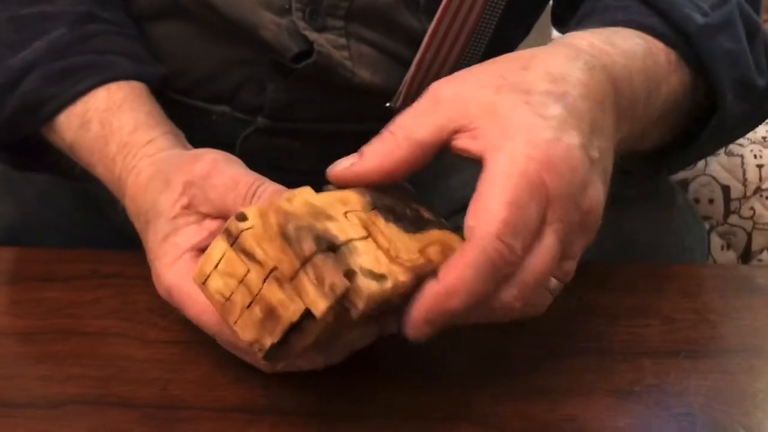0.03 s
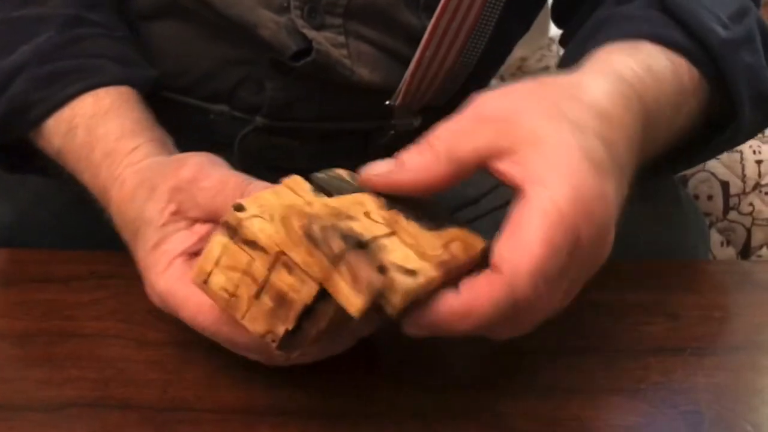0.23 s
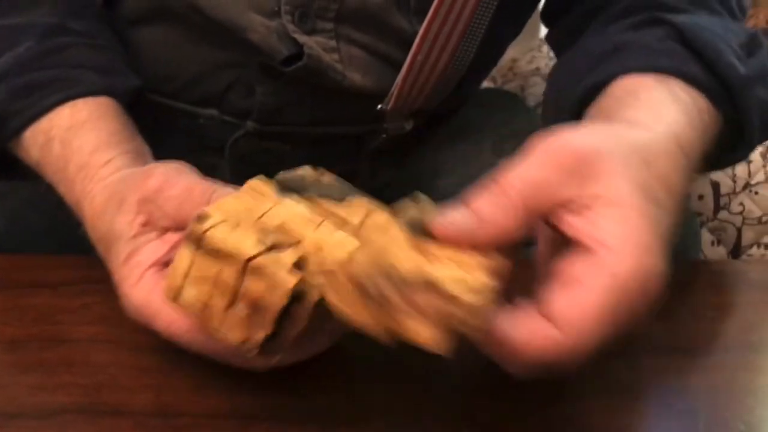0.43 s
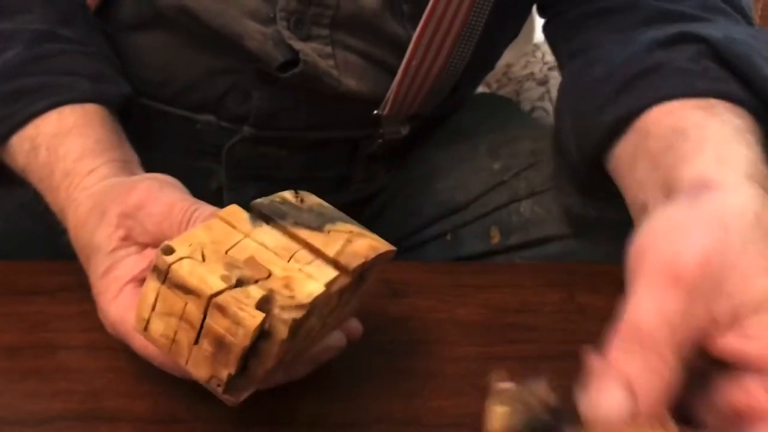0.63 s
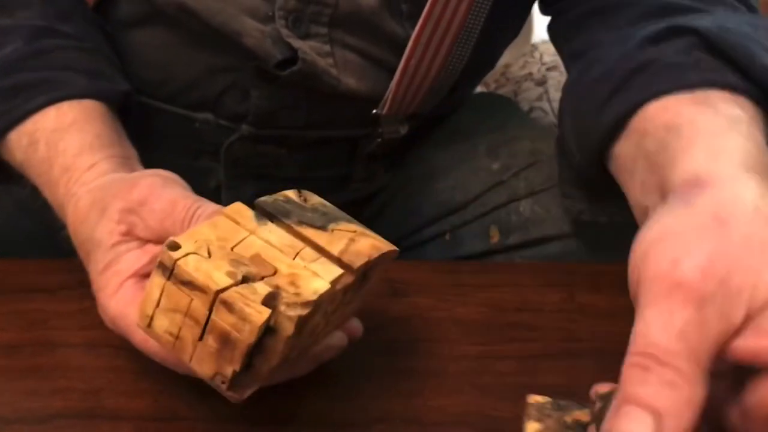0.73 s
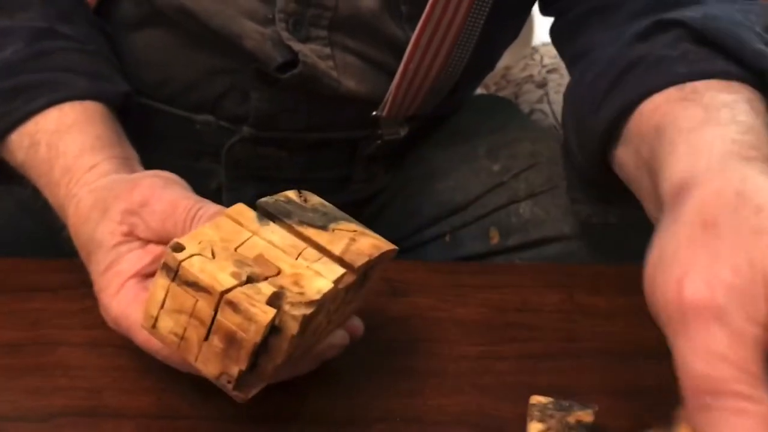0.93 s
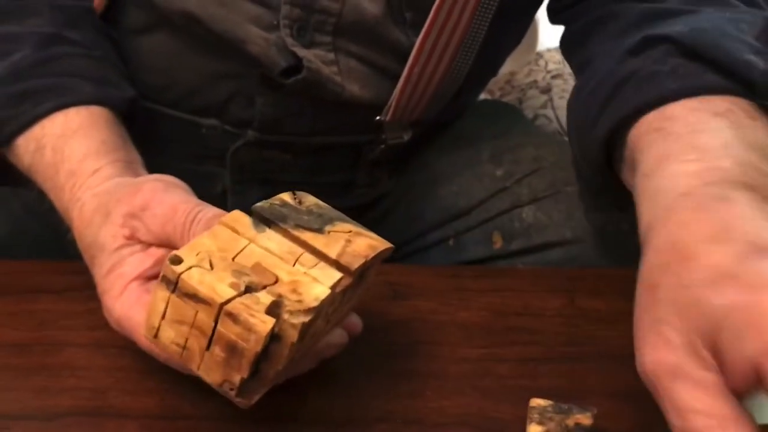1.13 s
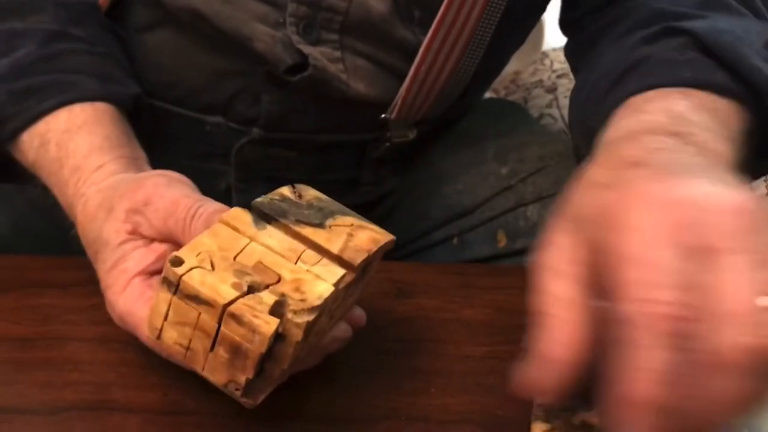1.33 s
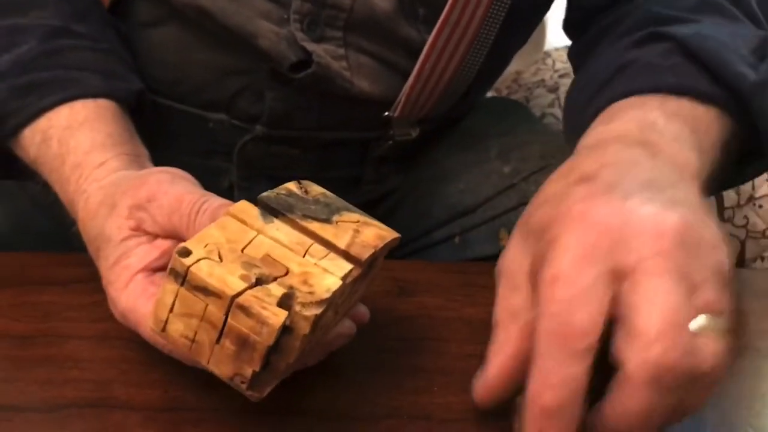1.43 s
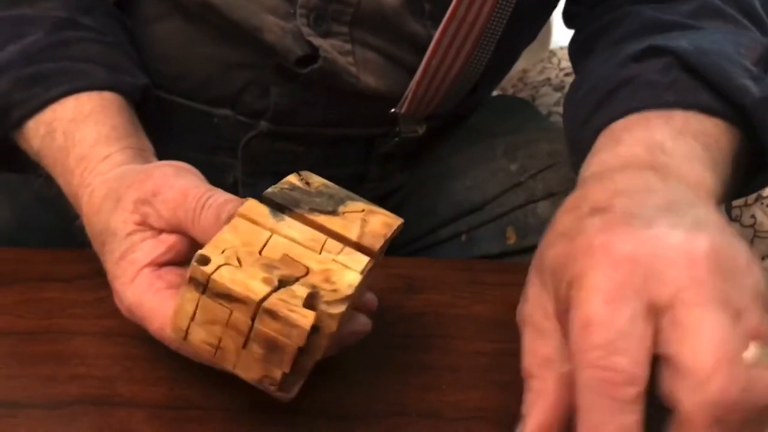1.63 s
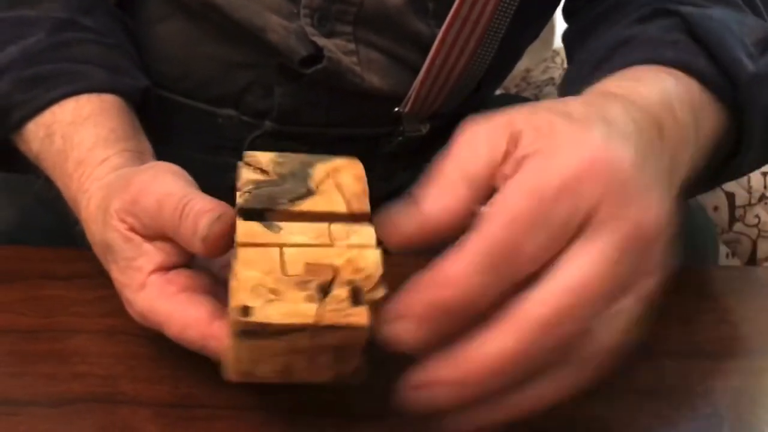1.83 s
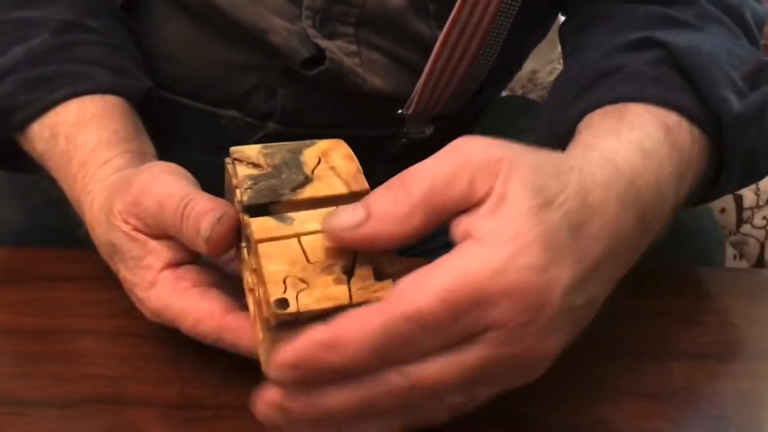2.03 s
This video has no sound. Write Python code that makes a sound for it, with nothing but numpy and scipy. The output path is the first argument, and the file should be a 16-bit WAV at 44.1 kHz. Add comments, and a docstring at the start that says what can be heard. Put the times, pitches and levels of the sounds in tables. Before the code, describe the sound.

Small wood block pieces clack apart by hand, one dropped rattling on a tabletop and tipped

```python
"""A loose piece of a wooden puzzle is dropped on a wooden table, rattles to rest, and is knocked over and nudged.
Each knock adds a short click, the piece's own dying tones, a table thud and a low boom that lingers.
Before that it slides out of the block with dull clicks, heard with a short ring of the block held in the hands.
Shaped noise makes the soft rubbing of skin and wood, the low bumps of moving arms and the quiet room.
Near reflections and a fading noise tail make the table and the small room answer."""
import sys
import numpy as np
from scipy import signal
from scipy.fft import rfft, irfft, next_fast_len
from scipy.io import wavfile

SR = 44100
rng = np.random.default_rng(int(sys.argv[2]) if len(sys.argv) > 2 else 0)


def dump(signal):
    """Clip the signal to [-1, 1] and save it as 16-bit WAV at the path in sys.argv[1]."""
    limited = np.clip(np.atleast_2d(signal).T, -1, 1)
    pcm = np.round(limited * 32767).astype(np.int16)
    wavfile.write(sys.argv[1], SR, pcm)


N = 92610  # samples in the scene
LENGTH, RING_LENGTH = 32768, 6000  # samples in one blow, and in the ring of the loose piece
T = np.arange(LENGTH) / SR  # seconds within one blow
HZ = np.fft.rfftfreq(LENGTH, 1 / SR)


def amp(db):
    """Turn decibels into a gain."""
    return 10 ** (np.asarray(db) / 20)


def along(points, hz):
    """Read a curve of (pitch_hz, value) points on a logarithmic pitch axis."""
    point_hz, value = np.transpose(points)
    return np.interp(np.log(hz + 1), np.log(point_hz), value)


def unit(x):
    """Scale a sound to unit energy."""
    return x / np.linalg.norm(x)


def add(track, start_s, sound):
    """Mix a sound into the track, cutting it off at the end of the track."""
    part = track[round(start_s * SR):][:len(sound)]
    part += sound[:len(part)]


def pulse(colour):
    """A click of unit energy with the given spectrum, packed as early as possible (minimum phase)."""
    cepstrum = irfft(np.log(amp(along(colour, HZ))))
    # fold the second half onto the first, so that nothing sounds before the click
    cepstrum[1:LENGTH // 2] *= 2
    cepstrum[LENGTH // 2 + 1:] = 0
    return unit(irfft(np.exp(rfft(cepstrum))))


def noise(colour):
    """Steady noise with the given spectrum and an rms of 1."""
    size = next_fast_len(N + LENGTH)
    gain = amp(along(colour, np.fft.rfftfreq(size, 1 / SR)))
    x = irfft(rfft(rng.standard_normal(size)) * gain, size)[:N]
    return x / x.std()


def soften(x, cutoff_hz):
    """A softer contact loses its treble."""
    return signal.lfilter(*signal.butter(2, cutoff_hz, fs=SR), x)


def modes(hz, t60, size=LENGTH):
    """One dying sine per row; each falls by 60 dB in its t60 seconds."""
    t = T[:size]
    decay = np.exp(-np.log(1000) * t / t60[:, None])
    return np.sin(2 * np.pi * np.outer(hz, t)) * decay


def ringing(rows):
    """A ring of unit energy, made of dying sines from (pitch_hz, t60_s, level_db) rows."""
    hz, t60, level_db = np.transpose(rows)
    return unit(amp(level_db) @ modes(hz, t60))


def crack(click):
    """Rough faces meet at many points within a few milliseconds, which roughens the click."""
    crunch_s, crunch_share = 0.0014, 0.65  # fade time to 1/e; crunch energy before the first contact is added
    force = np.sqrt(crunch_share) * unit(rng.standard_normal(LENGTH) * np.exp(-T / crunch_s))
    force[0] += np.sqrt(1 - crunch_share)
    return unit(irfft(rfft(click) * rfft(force)))


def toned(x, tone_hz):
    """The spot struck strengthens one band of the click."""
    band = signal.iirpeak(tone_hz, 7.2, fs=SR)  # 7.2: sharpness (Q)
    return x + amp(1.5) * signal.lfilter(*band, x)  # 1.5 dB: gain of the added band


# near reflections from tabletop and body, before their treble is dulled: delay_s, gain (plain factor)
NEAR_REFLECTIONS = [(.0023, 0.53), (.0031, 0.32), (.0052, .35), (.0066, .2)]


def reflected(x):
    """A click followed by a few delayed copies, dulled above 4500 Hz."""
    copies = sum(gain * np.exp(-2j * np.pi * HZ * delay_s) for delay_s, gain in NEAR_REFLECTIONS)
    near = copies / (1 + 1j * HZ / 4500)
    return irfft(rfft(x) * (1 + near))


# how long the room takes to fade by 60 dB: pitch_hz, t60_s
ROOM_FADE = [(60, 0.37), (200, 0.26), (600, 0.3), (1500, 0.29), (3000, 0.2), (6000, 0.28), (14000, 0.12)]
# tone balance of the room's answer: pitch_hz, level_db
ROOM_BALANCE = [(50, 9), (200, -1.5), (800, 1.5), (2500, -4.5), (5000, -12), (9000, -9.5), (16000, -11)]


def room(x):
    """The room's blurred answer to one blow: noise that builds up quickly and fades at its own rate per pitch."""
    rise_s = 0.0009
    hz, t, grid = signal.stft(rng.standard_normal(LENGTH), SR, nperseg=256)
    fade = amp(-60 * t / along(ROOM_FADE, hz)[:, None])
    tail = signal.istft(grid * fade, SR)[1][:LENGTH]
    tail = unit(tail * (1 - np.exp(-(T / rise_s) ** 2)))
    return irfft(rfft(x) * rfft(tail) * amp(along(ROOM_BALANCE, HZ)))


def strokes(rows):
    """Loudness of movements: each rises in a line for rise_s, then falls about 27 dB per fall_s."""
    t = np.arange(N) / SR
    total = np.zeros(N)
    for start_s, rise_s, fall_s, level_db in rows:
        swell = np.clip((t - start_s) / rise_s, 0, 1)
        fade = np.exp(-np.pi * np.maximum(t - start_s - rise_s, 0) / fall_s)
        total += amp(level_db) * swell * fade
    return total


def friction(rows, colour, grain_db, grain_rate):
    """A sliding hiss whose loudness wavers finely: grain_rate random levels per second, spread by grain_db."""
    grain = np.interp(np.arange(N) / SR * grain_rate, np.arange(N), rng.standard_normal(N))
    return strokes(rows) * amp(grain_db * grain) * noise(colour)


# tone balance of the quiet room: pitch_hz, level_db
QUIET_BALANCE = [(12, -31.5), (20, -9), (44, 6), (107, -11), (177, -1), (241, -10.5), (367, -13),
                 (949, -24), (1480, -19), (3530, -21), (4940, -27), (9140, -25.5), (16000, -36)]


def quiet_room():
    """Faint steady noise under everything."""
    return amp(-65.5) * noise(QUIET_BALANCE)


# low bumps of the moving arms: start_s, rise_s, fall_s, level_db
ARM_BUMPS = [(.29, 0.032, 0.27, -45.5), (.645, 0.04, 0.25, -49), (1.38, 0.027, 0.11, -53)]
# their tone balance: pitch_hz, level_db
ARM_BALANCE = [(15, -15.5), (40, 1), (60, -5), (100, -20.5), (300, -19.5), (2000, -90)]


def arm_bumps():
    """Moving arms make low noise that swells and dies away."""
    return strokes(ARM_BUMPS) * noise(ARM_BALANCE)


# skin brushing the wood: start_s, rise_s, fall_s, level_db
SKIN_RUBS = [(.065, 0.07, 0.61, -55.5), (.195, 0.01, 0.073, -53), (.27, 0.021, 0.37, -72),
             (.65, 0.069, 0.045, -69.5), (.83, 0.19, 0.19, -68.5), (1.77, 0.061, 0.36, -66.5)]
# its tone balance: pitch_hz, level_db
SKIN_BALANCE = [(100, 4), (400, 3), (1000, -2.5), (2600, -3.5), (3600, -3.5), (4600, 1), (6300, -6),
                (7500, -12), (8700, -6.5), (9600, -1), (10500, -6), (13000, -10), (16000, -25.5)]


def skin_rubs():
    """Skin brushes the wood with a soft, grainy hiss."""
    return friction(SKIN_RUBS, SKIN_BALANCE, grain_db=2.5, grain_rate=400)


# the piece scraping in its slot: start_s, rise_s, fall_s, level_db
SLOT_SCRAPES = [(.125, 0.018, 0.0616, -65.5), (.18, 0.009, 0.032, -54), (.28, 0.046, 0.037, -55.5),
                (.36, 0.028, 0.046, -56)]
# its tone balance: pitch_hz, level_db
SLOT_BALANCE = [(200, -13), (1200, -7), (3000, 3), (3600, -14), (4600, 5), (5100, -7), (5550, 9),
                (5900, -1), (6400, 0), (7400, -19), (9600, -10), (10400, -15), (11700, -1), (16000, -42)]


def slot_scrapes():
    """Wood scrapes on wood as the piece leaves its slot, a hiss with strong narrow bands."""
    return friction(SLOT_SCRAPES, SLOT_BALANCE, grain_db=3, grain_rate=600)


# a piece sliding over the table: start_s, rise_s, fall_s, level_db
TABLE_SLIDES = [(1.345, 0.028, 0.21, -56.5), (1.39, 0.049, 0.34, -64.5)]
# its tone balance: pitch_hz, level_db
SLIDE_BALANCE = [(100, 1), (1000, 1.5), (2200, -5), (2860, 0.5), (3300, -2.5), (5000, -7), (5450, -1),
                 (6200, -26), (8000, -21), (9100, -2), (9600, -1), (10600, -14.5), (13000, -11),
                 (16000, -38)]


def table_slides():
    """The piece slides over the tabletop with a grainy hiss."""
    return friction(TABLE_SLIDES, SLIDE_BALANCE, grain_db=2, grain_rate=500)


# clicks of the piece against the block:
# start_s, click_db, contact_hz (treble cut-off), tone_hz (tone of the spot struck), ring_db
HELD_CLICKS = [(0.07, -27.5, 1100, 480, -34), (0.108, -41, 5000, 1500, -45),
               (0.1677, -39, 4000, 1200, -33.5), (0.1928, -24, 5600, 4360, -48),
               (0.2001, -7, 3200, 2710, -7), (0.312, -30, 3020, 2400, -60),
               (0.3369, -13.5, 3100, 2180, -14.5), (0.3834, -26, 7500, 5530, -42),
               (0.412, -45, 2710, 1700, -27), (0.441, -33, 11000, 4470, -38.5),
               (1.271, -37.5, 14000, 6000, -60)]
# tone balance of those clicks: pitch_hz, level_db
HELD_BALANCE = [(100, -26.5), (500, -25.5), (1050, 0), (1800, -3), (2800, 8), (4000, -3.5), (6000, -8),
                (10000, -29), (16000, -45)]
# tones of the assembled block, damped by the hands: pitch_hz
BLOCK_PITCHES = [1082, 1392, 1778, 2060, 2492, 2700, 3070]
# how each of them rings: t60_s, level_db (relative to each other)
BLOCK_RINGS = [(0.053, -5.5), (0.083, -8.5), (0.031, 2), (0.029, 1), (0.068, -6), (0.013, -14), (0.01, -1)]


def held_clicks():
    """The piece catches on the block as it slides out; the block rings briefly in the hands."""
    track, click = np.zeros(N), pulse(HELD_BALANCE)
    t60, level_db = np.transpose(BLOCK_RINGS)
    sizes = amp(level_db) * (-1) ** np.arange(len(t60))  # every other tone starts the opposite way
    ring = unit(sizes @ modes(BLOCK_PITCHES, t60))
    for start_s, click_db, contact_hz, tone_hz, ring_db in HELD_CLICKS:
        snap = reflected(toned(crack(click), tone_hz))
        blow = soften(amp(click_db) * snap + amp(ring_db) * ring, contact_hz)
        add(track, start_s, blow + amp(-6.5) * room(blow))
    return track


# knocks of the loose piece on the table: start_s, click_db, contact_hz (treble cut-off),
# tone_hz (tone of the spot struck), ring_db, edge (0 = face, 1 = edge), life (factor on ring times),
# thud_db, thud_hz (treble cut-off of the thud), boom_db
TABLE_KNOCKS = [(0.4714, -8, 6960, 4170, -12.5, 0, .7, -3, 1390, -15),
                (0.501, -4, 6500, 4230, -6.5, 0.06, .6, -8, 2430, -16.5),
                (0.5155, -26, 5000, 2200, -28, 0.1, .6, -18, 1500, -36),
                (0.5221, -9, 6500, 4200, -1, 0.21, .6, -15.5, 890, -10.5),
                (0.542, -10, 3100, 2830, -8, 0, .7, -16, 1500, -23),
                (0.546, -15, 4500, 3330, -17, 0.3, .6, -20, 1500, -32),
                (0.5632, -18, 4870, 3280, -34, 0, .6, -19.5, 1520, -14),
                (0.5829, -17, 6540, 5440, -18.5, .1, .6, -29, 1500, -29),
                (0.5893, -7.5, 3700, 2900, -8.5, 0, .7, -14.5, 1510, -6),
                (0.6042, -25, 4000, 3500, -24, 0, .7, -23.5, 1570, -37),
                (.611, -19.5, 3700, 2520, -21.5, 0, .8, -20, 1480, -28.5),
                (.632, -29, 5900, 5400, -33, 0.2, .8, -18.5, 1500, -15.5),
                (0.9433, -16.5, 8600, 1438, -20.5, 0.4, 1, -9, 3000, -13),
                (1.1204, -1.5, 10300, 8240, -2.5, 0.99, 0.81, -8.5, 550, -4.5),
                (1.1226, -8, 6000, 4890, -3.5, 0.98, .6, -14.5, 605, -21),
                (1.1754, -8, 5000, 1506, -6.5, 0.68, .8, -15, 1500, -29),
                (1.1769, -11, 6500, 3810, 1.5, 0.96, 1, -15.5, 1480, -27),
                (1.1928, -20, 8100, 3387, -29, 0.3, .7, -30.5, 1500, -35),
                (1.2058, -18, 5070, 2780, -23.5, 1, .7, -23, 1500, -48.5),
                (1.333, -15.5, 3420, 1680, -50, 0.6, .7, -18.5, 1100, -9.5),
                (1.5545, -31, 3500, 1370, -29, 0, 1, -27, 1800, -15)]
# tone balance of the clicks: pitch_hz, level_db
KNOCK_BALANCE = [(100, -22), (700, -13), (1500, -2), (2600, 3.5), (4300, -5.5), (5500, -4.5), (6500, -18),
                 (7400, -13.5), (8800, -11), (11000, -16.5), (16000, -14)]
# tones of the loose piece: pitch_hz
PIECE_PITCHES = [1057, 1348, 1510, 2203, 2494, 2818, 3150, 3600, 3830, 4250, 4900, 6590, 6840, 8350, 9300]
# how each of them rings: t60_s (before life), face_db, edge_db (levels when struck on face or edge)
PIECE_RINGS = [(0.12, -14, -32.5), (0.1, -21, -23), (0.056, -6, -14), (0.021, 6, -0.5), (.035, -1, -15),
               (0.03, -14, 2.5), (0.011, -9.5, -13), (0.0073, -9.5, -16), (0.035, -31, 3.5), (0.012, 7, -5),
               (0.0098, -18.5, -12.5), (0.023, -30, -10.5), (0.019, -8, -41), (0.011, -24.5, -11),
               (0.013, -3, -19)]
# tone balance of the table thud: pitch_hz, level_db
THUD_BALANCE = [(30, -16.5), (90, -13.5), (190, 9), (330, -5), (600, -1.5), (820, -8), (1100, -2.5),
                (1550, 2.5), (2200, -13), (4000, -24), (16000, -62.5)]
# short tones of the tabletop: pitch_hz, t60_s, level_db (relative to each other)
BOARD_TONES = [(195.6, 0.1, -4.5), (412, 0.044, -11), (639, 0.058, 0.5), (1085, 0.073, -0.5),
               (1515, .05, -6)]
# low tones that a thud sets ringing in table and room: pitch_hz
BOOM_PITCHES = [182, 205, 276, 330, 472, 612, 654, 745]
# how each of them rings: level_db (boom_db is added), t60_s
BOOM_RINGS = [(-31, 0.44), (-34.5, 0.24), (-56.5, 1), (-54, 0.86), (-49.5, 0.65), (-43, 0.18),
              (-41.5, 0.23), (-63.5, 1)]


def knocks():
    """Each contact clicks, rings the piece a little differently, thuds the table and starts the boom."""
    track, click, thud = np.zeros(N), pulse(KNOCK_BALANCE), pulse(THUD_BALANCE)
    t60, face_db, edge_db = np.transpose(PIECE_RINGS)
    signs = (-1) ** np.arange(len(t60))  # every other tone starts the opposite way
    board = amp(-4) * ringing(BOARD_TONES)  # relative to the thud
    low_db, low_t60 = np.transpose(BOOM_RINGS)
    boom_rise = 1 - np.exp(-T / .015)  # builds up over some 15 ms
    boom = amp(low_db) @ modes(BOOM_PITCHES, low_t60) * boom_rise
    for (start_s, click_db, contact_hz, tone_hz, ring_db,
         edge, life, thud_db, thud_hz, boom_db) in TABLE_KNOCKS:
        # the place struck blends the face and edge levels; each tone then varies by chance (1.2 dB spread)
        sizes = signs * ((1 - edge) * amp(face_db) + edge * amp(edge_db))
        sizes = sizes * amp(1.2 * rng.standard_normal(len(t60)))
        ring = unit(sizes @ modes(PIECE_PITCHES, t60 * life, size=RING_LENGTH))
        ring = amp(ring_db) * np.pad(soften(ring, contact_hz), (0, LENGTH - RING_LENGTH))

        snap = amp(click_db) * soften(toned(crack(click), tone_hz), contact_hz)
        blow = snap + amp(thud_db) * soften(thud, thud_hz)
        tabletop = amp(thud_db) * soften(board, thud_hz)
        tail = room(amp(-0.23) * blow + amp(-5) * ring)
        add(track, start_s, reflected(blow) + ring + tabletop + tail + amp(boom_db) * boom)
    return track


def scene():
    """The quiet room and the handling sounds, then the clicks and the knocks, mixed to one channel."""
    background = quiet_room() + arm_bumps()
    rubbing = skin_rubs() + slot_scrapes() + table_slides()
    return (background + rubbing + held_clicks() + knocks())[None]


def record(dry):
    """A steep low-pass filter removes nearly everything above 15800 Hz."""
    return signal.sosfilt(signal.ellip(10, .1, 80, 15800, fs=SR, output="sos"), dry)


dry = scene()
out = record(dry)
dump(out)
```